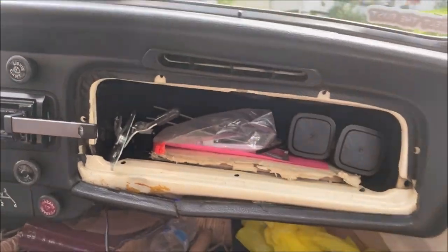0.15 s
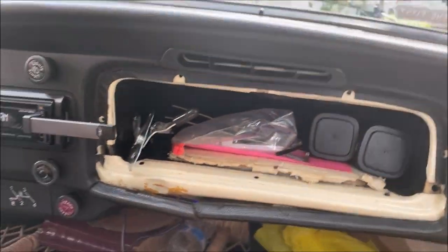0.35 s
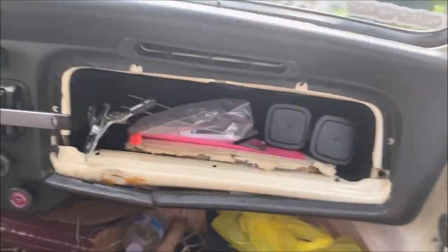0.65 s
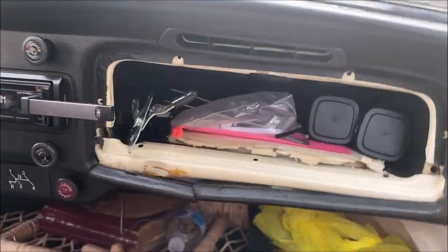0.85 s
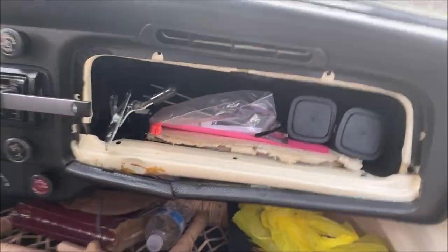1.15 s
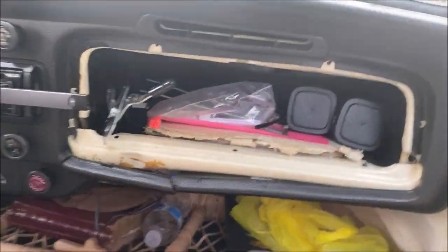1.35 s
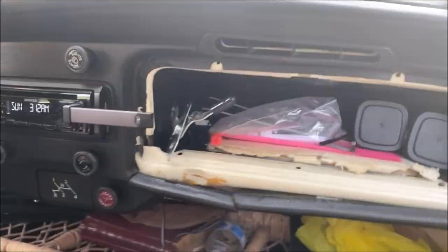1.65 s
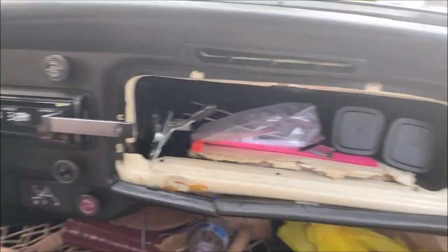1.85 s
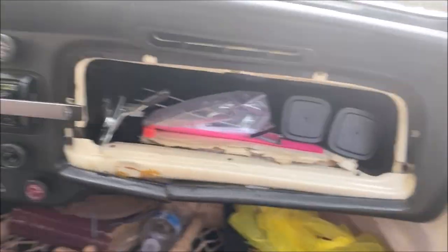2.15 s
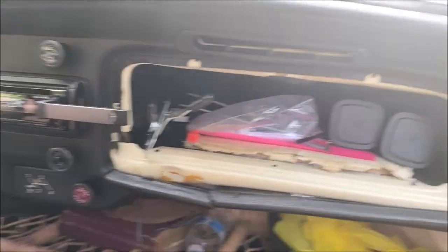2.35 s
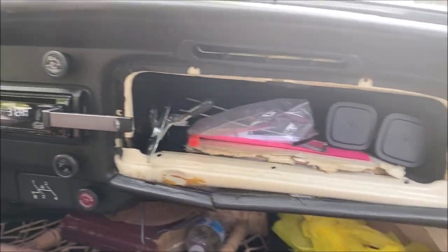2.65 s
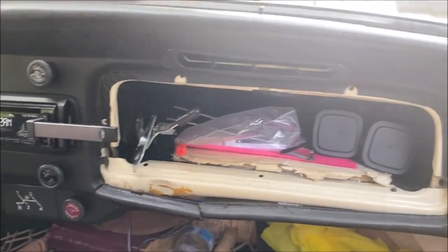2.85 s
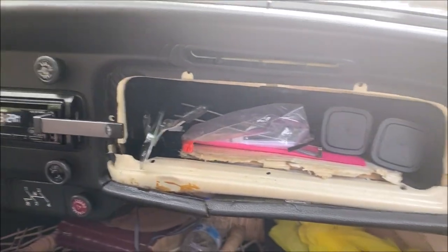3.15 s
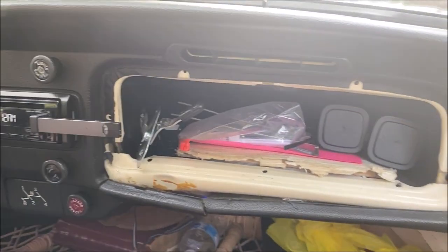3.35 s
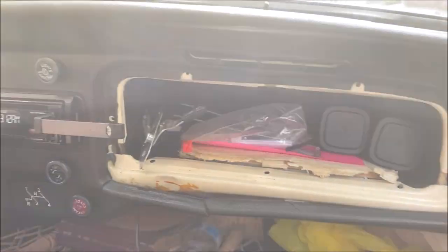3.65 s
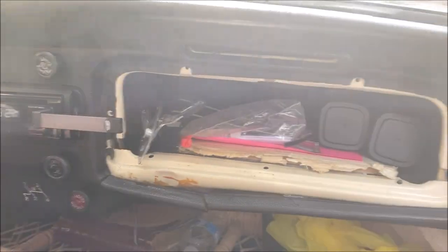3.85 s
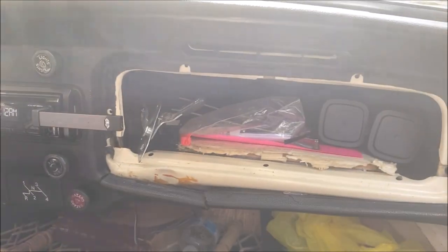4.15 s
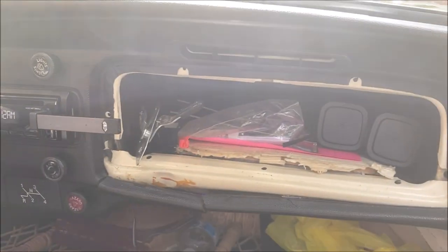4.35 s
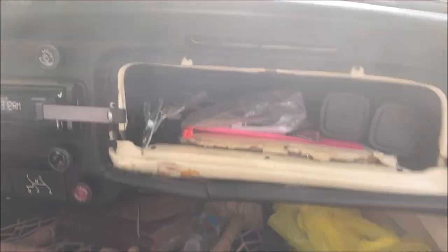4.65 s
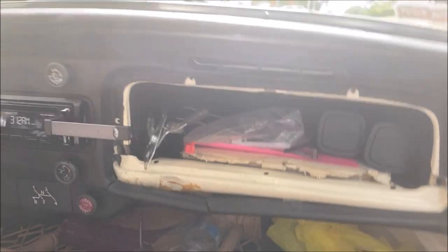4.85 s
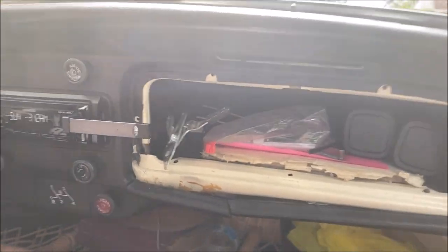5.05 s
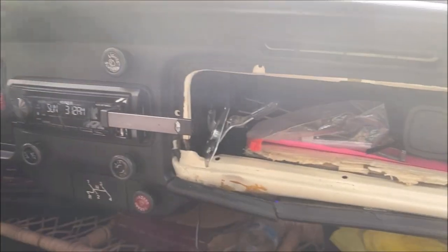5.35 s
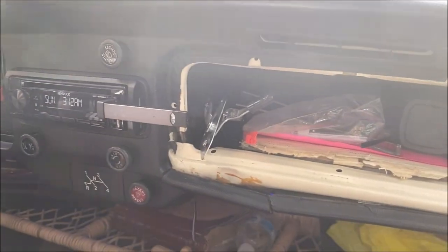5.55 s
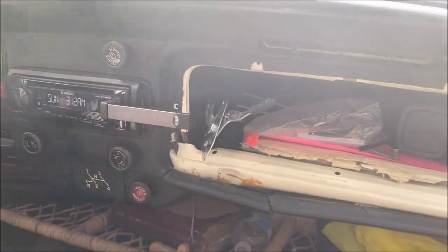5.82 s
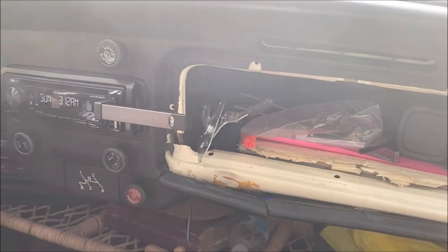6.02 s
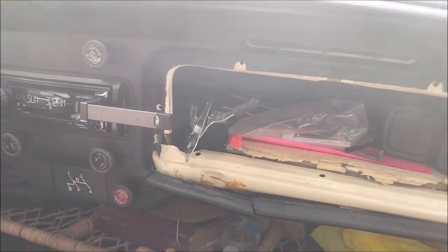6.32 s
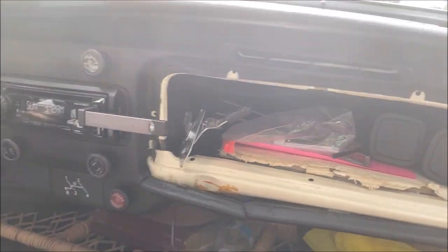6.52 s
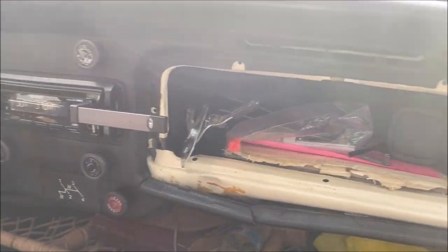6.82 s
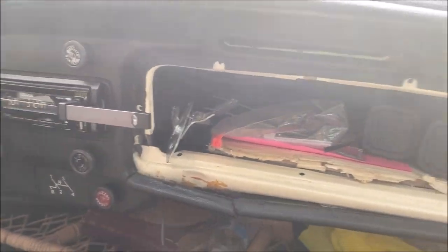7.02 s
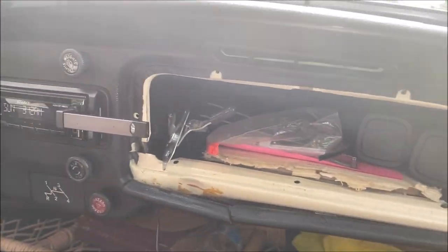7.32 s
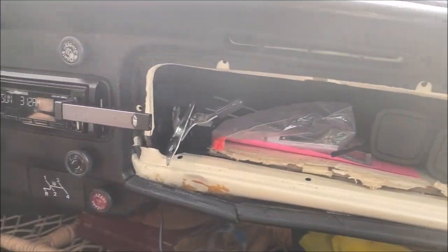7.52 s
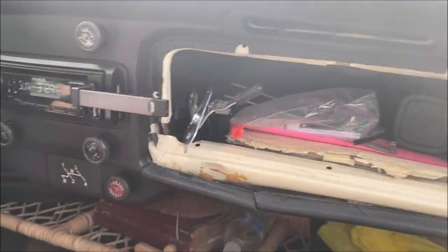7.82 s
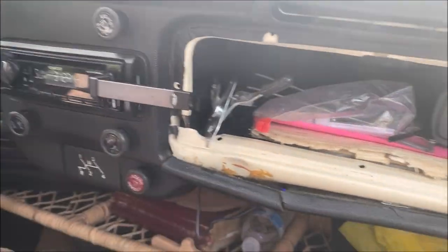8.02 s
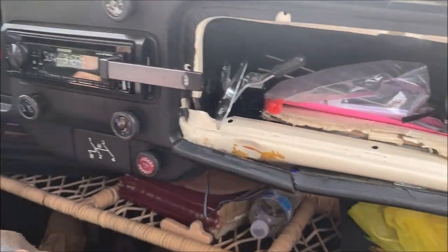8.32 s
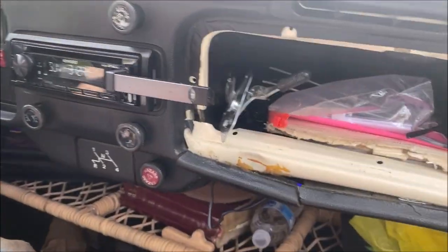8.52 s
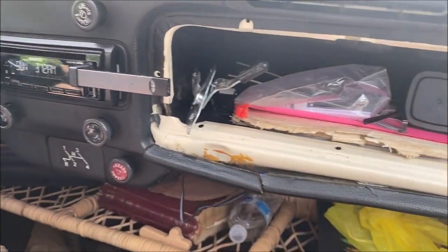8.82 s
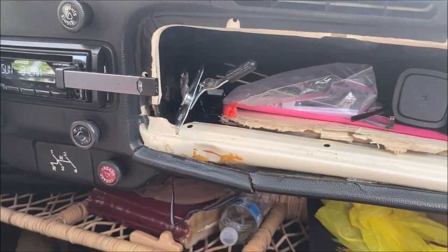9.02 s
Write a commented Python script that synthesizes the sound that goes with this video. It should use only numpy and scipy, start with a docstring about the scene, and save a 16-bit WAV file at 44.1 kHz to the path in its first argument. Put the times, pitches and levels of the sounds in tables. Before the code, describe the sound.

Rattly old car cabin: throbbing engine revs up over rumbling road, passing things whoosh by, revs fall, then pick up once more.

```python
"""Inside the bare cabin of a small car with an air-cooled flat four: the revs climb, hold, sink and start up
again. The engine is a sum of tones at multiples of its cycle rate, made louder or softer by the cabin. Filtered
noise gives road rumble, drone, roar, wind and the rush of things passing; narrow noise bands give the
shuddering shell, ringing panels, whistle and a grainy treble ring; short dying bursts give ticks and knocks. A
hand-held phone hears it through two microphone ports."""
import sys
import numpy as np
from scipy import signal
from scipy.fft import rfft, irfft
from scipy.io import wavfile
from scipy.ndimage import uniform_filter1d

SR = 44100
rng = np.random.default_rng(int(sys.argv[2]) if len(sys.argv) > 2 else 0)


def to_wav(s):
    """Save 16-bit WAV."""
    ch = np.atleast_2d(s).T  # columns
    pcm = np.round(np.clip(ch, -1, 1) * 32767)  # PCM
    wavfile.write(sys.argv[1], SR, pcm.astype(np.int16))


def boost(x):
    """Linear amplitude factor 10**(x/20) for a level x in decibels (scalar or array-like)."""
    u = np.asarray(x, float) / 20
    return 10 ** u


N = 404838  # samples
SECONDS = np.arange(N) / SR
HZ = np.fft.rfftfreq(N, 1 / SR)

# engine cycle rate, a quarter of the firing rate, before the surge: time_s, cycle_hz
REVS = [(0.0, 16.7), (0.6, 16.3), (1.1, 16.5), (2.4, 20.0), (3.81, 26.2), (4.52, 28.9), (5.27, 29.8),
        (5.72, 29.7), (6.19, 28.8), (6.75, 26.4), (7.77, 22.1), (8.39, 21.2), (8.79, 21.5), (8.95, 22.5),
        (9.18, 22.8)]
# the driver's foot: time_s, throttle_opening (0-1), engine_pull (about 0-1)
THROTTLE = [(0, 0.05, 0), (.5, .22, 0), (1.1, .3, 0.21), (2.2, 0.6, 0.39), (3.0, 0.7, 1.04), (3.9, 1, 0.72),
            (4.75, 1.0, 0.44), (5.3, 0.78, 0.54), (5.8, 0.3, 0.29), (6.4, 0, 0.02), (7.2, 0, 0.18),
            (8.4, .1, 0.66), (9.18, 0.5, 0.89)]
# driveline winding up and letting go as the car pulls away: centre_s, half_length_s, swing_hz, swings_per_s
SURGE = (1.7, 0.68, 0.71, 2.9)
CRUISE_HZ = 22  # cycle rate at which the base levels hold

# strong engine tones: multiple_of_cycle, coasting_db (at CRUISE_HZ), full_pull_more_db, db_per_octave of revs
STRONG_ORDERS = [(2, -23, -5, 6.5), (4, -14.5, 0, 8), (5, -31, 8.5, 7.3), (6, -19.5, -6.6, 5.5),
                 (7, -28, -0.3, -5.5), (8, -28, 11.5, -20), (9, -35.5, 6.5, 15), (10, -38, 12.5, -5.5)]
# cabin boom as the strong tones sweep through: pitch_hz, gain_db
CABIN_BOOM = [(32, -7), (58, 3), (66, 1.1), (80, 4.5), (100, -3), (113, -10), (120, -3), (135, 1.8),
              (160, -1.24), (178, 0.26), (200, 1.6), (220, 5), (238, -1.4), (255, 4), (272, -9.5), (300, 1)]
# how the body passes on the weaker tones: pitch_hz, gain_db
BODY_GAIN = [(20, -60), (60, -37), (200, -23.5), (250, -33), (290, -41), (330, -36.5), (490, -38),
             (550, -47.5), (670, -36.5), (710, -66.5), (750, -31.5), (790, -52), (830, -35), (950, -53.5)]
# weaker tones that stand out: multiple_of_cycle
LOUDER_ORDERS = (11, 13, 18)
LOUDER_DB = 4
STRONG_SWAY_DB, WEAK_SWAY_DB = 1.4, 2.6  # typical random level change

# noise colours: pitch_hz, relative_db (per Hz)
RUMBLE_COLOUR = [(15, -30), (30, -11), (45, -4), (80, -5.5), (140, -10), (220, -15), (280, -22.5)]
DRONE_COLOUR = [(150, -26), (250, -4), (290, -7), (339, -6.5), (543, -11), (744, -11), (960, -20),
                (1100, -14), (1430, -31), (2420, -120)]
ROAR_COLOUR = [(530, -40), (900, 1.5), (975, -4), (1400, -3.5), (1620, -8), (3290, -15), (5310, -22.5),
               (7500, -28.5), (9750, -25), (16500, -120)]
HISS_COLOUR = [(5000, -12.5), (7000, -5), (10500, -9), (12000, -8), (15500, -9.5), (16200, -43)]
RUSH_COLOUR = [(900, -7), (2000, 2), (4000, -5), (7000, -11.5), (16000, -37)]

# levels that follow the car: throttle_shut_db (at CRUISE_HZ), full_throttle_more_db, db_per_octave of revs
WEAK_ORDERS_LEVEL = (-2, 3.5, 15)
RUMBLE_LEVEL = (-23, 1.3, 4.5)
DRONE_LEVEL = (-33, 3, 6.5)
ROAR_LEVEL = (-36, 0.6, 13.5)
HISS_LEVEL = (-51, 2, 8)
WHISTLE_LEVEL = (-68, 18, 6)
# whistle of the air drawn in: throttle_shut_hz (at CRUISE_HZ), full_throttle_more_hz, hz_per_octave of revs
WHISTLE_PITCH = (11400, 400, 1000)
DRONE_WALK_DB = 1.4

# things passing outside throw back an airy rush: centre_s, half_length_s, rush_db, hiss_db
RUSHES = [(0.0, 0.19, -51, -91), (4.665, 0.18, -32.5, -53), (6.113, 0.33, -36.5, -57),
          (8.074, 0.19, -37, -43.5)]
HISS_LAG_S, HISS_STRETCH = .07, 1.2  # the hiss of a rush comes later and lasts longer
# rough patches of road: centre_s, half_length_s, shudder_hz, shudder_db, rumble_more_db
ROUGH_PATCHES = [(1.0, 0.43, 71.8, -26, 5), (1.697, 0.5, 38, -25, 0), (4.098, 0.28, 69.6, -23.5, 5),
                 (6.953, 0.091, 66, -27, 5.5)]
SHELL_WIDTH_HZ = 10.3
# ringing thin panels: pitch_hz, width_hz, throttle_shut_db (at CRUISE_HZ), full_throttle_more_db, db_per_octave
PANELS = [(749, 8.8, -51, 5, -2), (1138, 26, -56.5, 10, -11)]
# spells in which the lower panel rings out: centre_s, half_length_s, level_db
RINGING = [(1.4, .15, -43), (2.7, .45, -42), (3.7, .45, -42), (8.4, .35, -42)]
# dry ticks of loose things: start_s, level_db
TICKS = [(0.7232, -34), (1.1594, -39.5), (1.6831, -36), (2.205, -28.5), (2.4326, -41), (2.829, -40),
         (8.1146, -31)]
# duller knocks: start_s, level_db, pitch_hz
KNOCKS = [(0.912, -40, 3060), (1.243, -29.5, 1730), (1.267, -24, 1230), (1.63, -36.5, 2320),
          (1.888, -36, 2160), (1.965, -32.5, 2470), (2.097, -28.5, 1590)]
# spells of a grainy ring high in the treble: centre_s, half_length_s, pitch_hz, level_db
GRAINY_RING = [(.3, .35, 7450, -57), (5.3, .5, 9650, -55), (5.86, .12, 8300, -53), (6.1, .22, 7450, -47),
               (8.0, .15, 7400, -48), (8.45, .35, 7750, -52)]

# sound common to both microphone ports: pitch_hz, share (0-1)
COMMON_SHARE = [(60, .99), (130, .96), (290, .5), (620, .4), (3000, .42), (6000, .45), (8500, .88),
                (14000, .85)]
# how far the left port is ahead: pitch_hz, lead_radians
LEFT_LEAD = [(60, 0), (690, .3), (1030, -3.1), (2930, -6.9), (6630, -6.2), (8350, -3.4), (9560, -3),
             (10200, -2.3), (11100, -.8), (12400, 0), (13500, 1.1), (14200, 2.3)]
# how much louder the left port is: pitch_hz, left_minus_right_db
LEFT_TILT = [(60, 0.5), (110, 2), (200, -1.5), (370, -2), (680, 0), (1240, 2.5), (2280, 0), (4180, -5.5),
             (7670, 2), (14100, 0.0)]


def curves(table):
    """Draws straight lines between table rows, giving each column one value a sample."""
    times, *columns = np.transpose(table)
    return [np.interp(SECONDS, times, column) for column in columns]


def over(table, hz):
    """Reads a table by pitch on a log-frequency axis."""
    pitches, values = np.transpose(table)
    return np.interp(np.log(hz + 1), np.log(pitches + 1), values)


def unit(x):
    """Scales a sound to an rms of 1."""
    return x / np.sqrt(np.mean(x ** 2))


def hump(centre_s, half_s):
    """A bell-shaped swell that peaks at 1."""
    return np.exp(-((SECONDS - centre_s) / half_s) ** 2)


def walk(rate):
    """Random wandering with a spread of 1: levels held for 1 / rate seconds, then smoothed twice."""
    hold = int(SR / rate)
    steps = np.repeat(rng.standard_normal(N // hold + 1), hold)
    smooth = uniform_filter1d(uniform_filter1d(steps, hold), hold)[:N]
    return smooth / smooth.std()


def noise():
    """Three white noises: one that reaches both ports and one for each port alone."""
    return rng.standard_normal((3, N))


def colour(x, table):
    """Filters by a table of levels, silent beyond its ends; rms 1."""
    inside = (HZ > table[0][0]) * (HZ < table[-1][0])
    return unit(irfft(rfft(x) * boost(over(table, HZ)) * inside, N))


def narrow(x, hz, width_hz):
    """Smooths noise into a slow swirl, then lifts it to a pitch that may move; rms 1."""
    slow = signal.lfilter([1], [1, -np.exp(-np.pi * width_hz / SR)], x[0] + 1j * x[1])
    carrier = np.exp(2j * np.pi * np.cumsum(hz * np.ones(N)) / SR)
    return unit(np.real(slow * carrier))


def driving():
    """Cycle rate with the surge, and two rules that make a value follow revs and throttle or pull."""
    (hz,), (throttle, engine_pull) = curves(REVS), curves(THROTTLE)
    centre_s, half_s, swing_hz, rate = SURGE
    surge = swing_hz * hump(centre_s, half_s) * np.cos(2 * np.pi * rate * (SECONDS - centre_s))
    octaves = np.log2(hz / CRUISE_HZ)

    def follow(control):
        return lambda base, full, per_octave: base + full * control + per_octave * octaves

    return hz + surge, follow(throttle), follow(engine_pull)


def engine(hz, law, pull):
    """Unsteady tones at multiples of the cycle boom in the body; also returns the phase of the cycle."""
    turn = 2 * np.pi * np.cumsum(hz * (1 + 0.003023 * walk(12))) / SR
    levels_db = {k: pull(*rule) + over(CABIN_BOOM, k * hz) for k, *rule in STRONG_ORDERS}
    # the firing tone and the one an octave above it
    firing = np.sqrt(2) * boost(levels_db[4] + 0.64 * walk(14)) * np.cos(4 * turn)
    octave_size = np.sqrt(2) * boost(levels_db[8] + STRONG_SWAY_DB * walk(15))
    near = firing + octave_size * np.cos(8 * turn + 0.45 + 0.79 * walk(7.8))

    weak_db = law(*WEAK_ORDERS_LEVEL)
    sways = [walk(7) for _ in range(8)]
    far = 0
    for k in (1, 2, 3, 5, 6, 7, *range(9, 34)):
        sway, drift = sways[k % 8], sways[k % 7]
        if k in levels_db:
            size = np.sqrt(2) * boost(levels_db[k] + STRONG_SWAY_DB * sway)
        else:
            extra_db = LOUDER_DB * (k in LOUDER_ORDERS) + WEAK_SWAY_DB * sway
            size = boost(over(BODY_GAIN, k * hz) + weak_db - 0.26 * k + extra_db)
        phase = k * turn + rng.uniform(0, 2 * np.pi) + .022 * k * drift
        near = near + size * np.cos(phase)
        # standing waves in the cabin put the higher tones at another phase at the second port
        far = far + size * min((k / 13) ** 2, 1.2) * np.sin(phase + rng.uniform(0, 2 * np.pi))
    return np.array([near, far, -far]), turn


def road(turn, law):
    """Rumble comes through the floor; drone and roar throb with the engine cycle and its firings."""
    throb = firing_throb(turn)
    rough_db = sum(db * hump(s, half) for s, half, _, _, db in ROUGH_PATCHES)
    rumble = colour(noise(), RUMBLE_COLOUR) * boost(law(*RUMBLE_LEVEL) + rough_db + 0.93 * walk(8))
    drone_db = law(*DRONE_LEVEL) + DRONE_WALK_DB * walk(12) + 1.5 * throb
    drone = colour(noise(), DRONE_COLOUR) * boost(drone_db)
    roar = colour(noise(), ROAR_COLOUR) * boost(law(*ROAR_LEVEL) + 0.8 * walk(17) + 0.32 * throb)
    return rumble + drone + roar


def firing_throb(turn):
    """A level swing with one beat per firing and a slower one per cycle."""
    return np.cos(4 * turn) + 1.1 * np.cos(turn)


def shell(law):
    """The body shudders on rough road and its thin panels ring, each as a narrow band of noise."""
    shudder = sum(narrow(noise(), hz, SHELL_WIDTH_HZ) * boost(db) * hump(s, half)
                  for s, half, hz, db, _ in ROUGH_PATCHES)
    spells = sum(boost(db) * hump(s, half) for s, half, db in RINGING)
    panels = 0
    for (hz, width_hz, *rule), extra in zip(PANELS, (spells, 0)):
        panels = panels + narrow(noise(), hz, width_hz) * (boost(law(*rule)) + extra)
    return shudder + panels


def rattles():
    """Loose things hit and die away in milliseconds: ticks are bursts of noise, knocks blurred tones."""
    t = np.arange(int(.04 * SR)) / SR
    out = np.zeros(N + len(t))
    for start_s, db in TICKS:
        burst = uniform_filter1d(rng.standard_normal(len(t)), size=8) * np.cos(2 * np.pi * 10500 * t)
        out[int(start_s * SR):][:len(t)] += 4 * boost(db) * burst * np.exp(-t / 0.0027)
    for start_s, db, hz in KNOCKS:
        rough = np.cumsum(rng.normal(0, 0.15, len(t)))  # a dull contact blurs the pitch
        tone = np.sin(2 * np.pi * hz * t + rough)
        out[int(start_s * SR):][:len(t)] += boost(db) * tone * np.exp(-t / 0.01)
    return out[:N]


def grainy_ring():
    """Dense random blows, about 250 a second, make a grainy ring that sounds in spells."""
    hits = (rng.random(N) < 250 / SR) * boost(2.5 * rng.exponential(size=N))
    blows = noise() * uniform_filter1d(hits, size=60)
    return sum(narrow(blows, hz, 300) * boost(db) * hump(s, half) for s, half, hz, db in GRAINY_RING)


def whistle(law):
    """Air drawn in makes a hissing band, 600 Hz wide, that follows revs and throttle."""
    return narrow(noise(), law(*WHISTLE_PITCH), 600) * boost(law(*WHISTLE_LEVEL) + 1.2 * walk(22))


def wind(turn, law):
    """Air hisses at the seals and swells with the revs; passing things add a rush and a trailing hiss."""
    trailing = sum(boost(db) * hump(s + HISS_LAG_S, half * HISS_STRETCH) for s, half, _, db in RUSHES)
    flicker = boost(0.87 * walk(22) + 1.1 * firing_throb(turn))
    hiss = colour(noise(), HISS_COLOUR) * (boost(law(*HISS_LEVEL)) + trailing) * flicker
    rush = colour(noise(), RUSH_COLOUR) * sum(boost(db) * hump(s, half) for s, half, db, _ in RUSHES)
    return hiss + rush


def scene():
    """Mixes all sources at two ports: shared sound differs in phase and level by pitch, the rest is unrelated."""
    hz, law, pull = driving()
    motor, turn = engine(hz, law, pull)
    both, left, right = rfft(road(turn, law) + wind(turn, law))
    close = rfft(motor[0] + shell(law) + rattles() + grainy_ring() + whistle(law))
    share = np.clip(over(COMMON_SHARE, HZ), 0, 1)
    common = np.sqrt(share) * both + close
    apart = np.sqrt(1 - share)
    # half of the lead and tilt goes to each port
    half = np.exp(.5j * over(LEFT_LEAD, HZ)) * boost(over(LEFT_TILT, HZ) / 2)
    ports = np.array([(common + apart * left) * half, (common + apart * right) / half])
    return irfft(ports, N) + 0.62 * motor[1:]


def roll_off(x):
    """The treble ends steeply here."""
    return signal.sosfilt(signal.butter(12, 14670, fs=SR, output="sos"), x)


def record(dry):
    """The phone gently rounds the loudest peaks."""
    mix = np.tanh(0.83 * dry) / 0.79
    return roll_off(mix)


dry = scene()
out = record(dry)
to_wav(out)
```